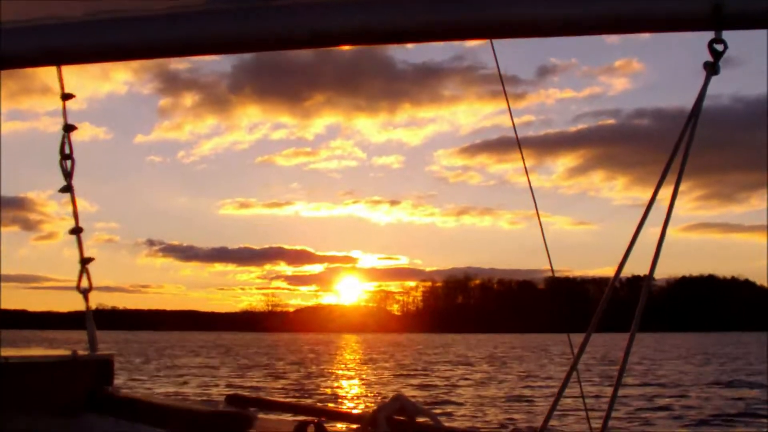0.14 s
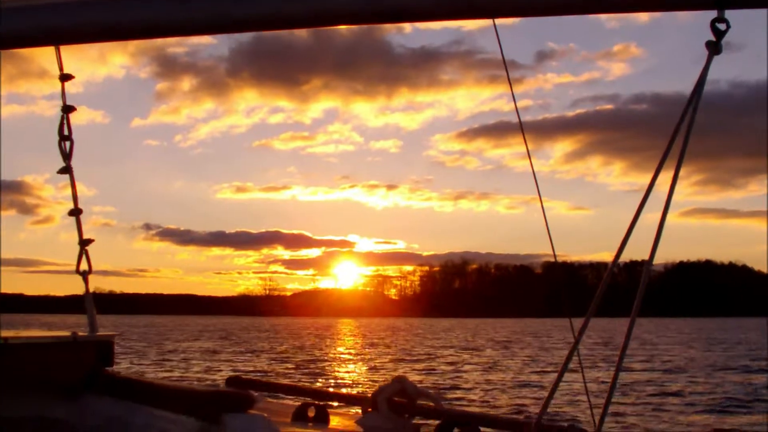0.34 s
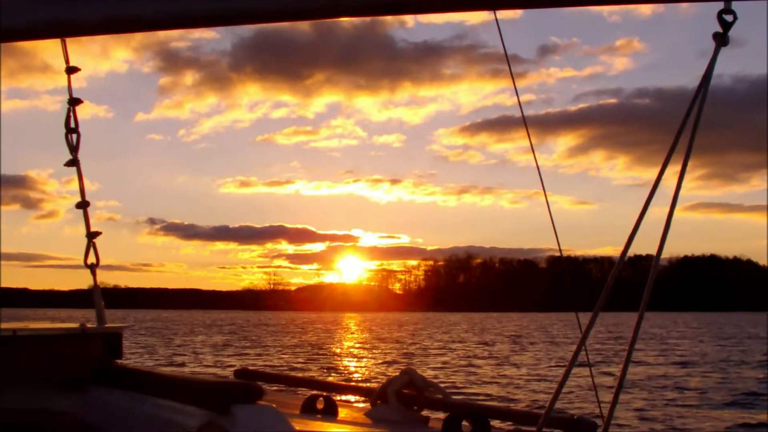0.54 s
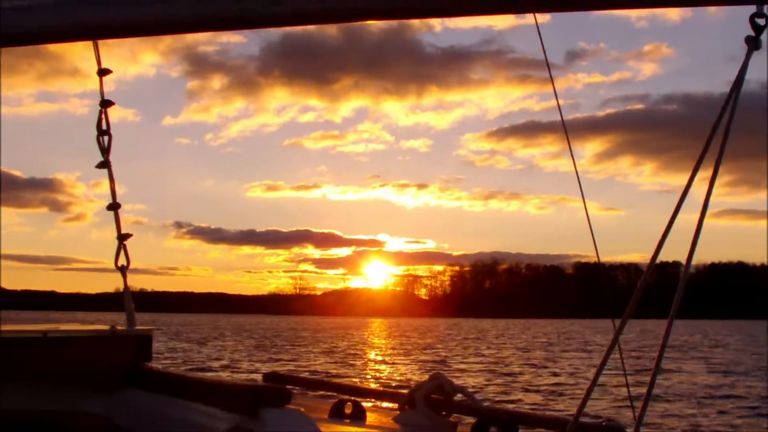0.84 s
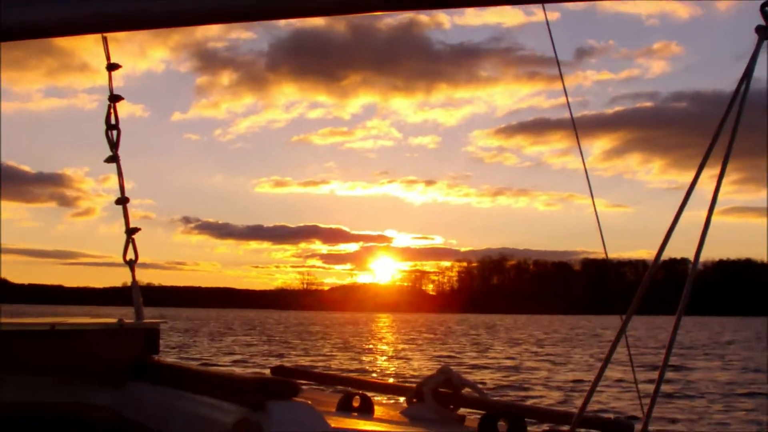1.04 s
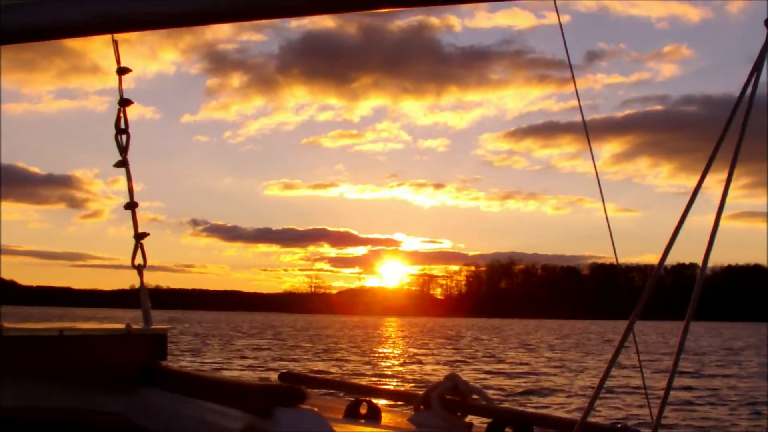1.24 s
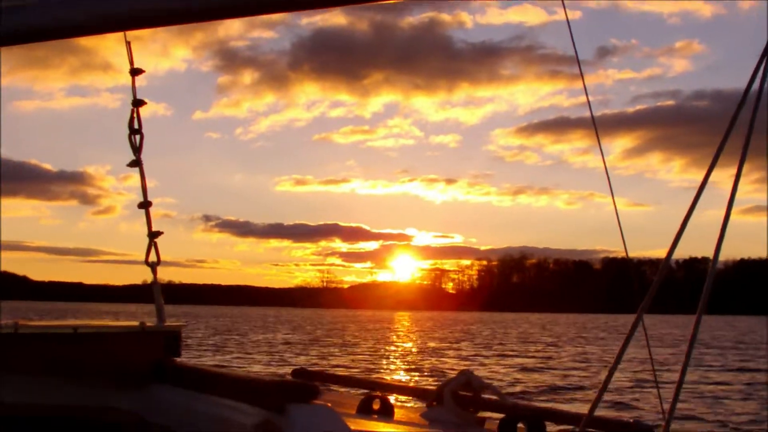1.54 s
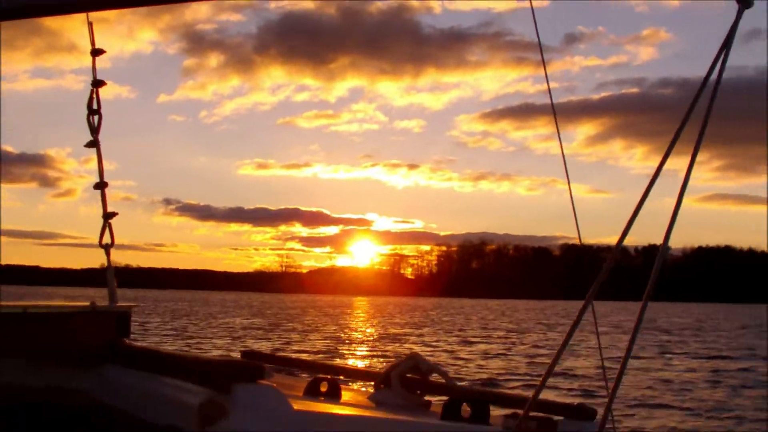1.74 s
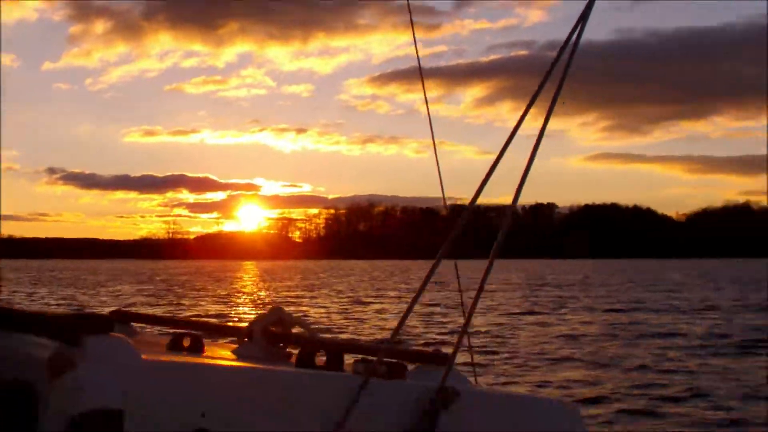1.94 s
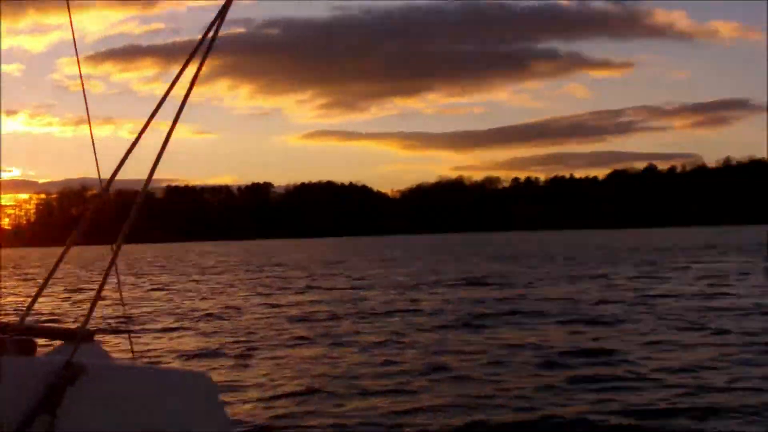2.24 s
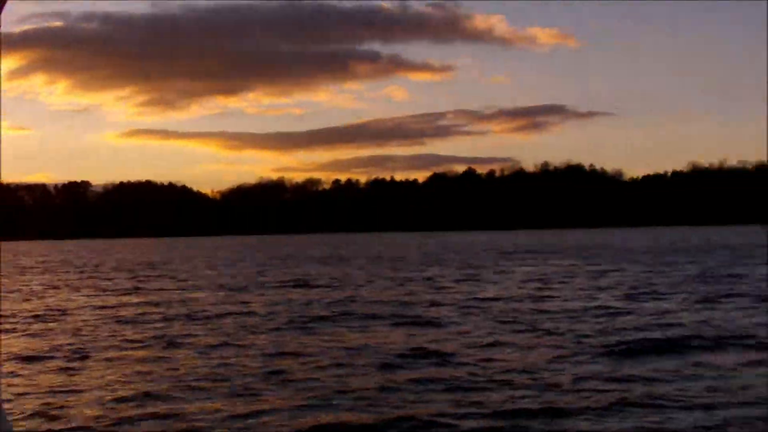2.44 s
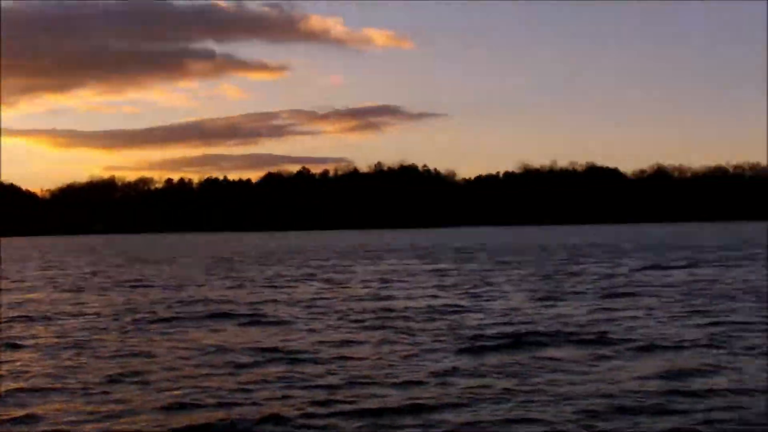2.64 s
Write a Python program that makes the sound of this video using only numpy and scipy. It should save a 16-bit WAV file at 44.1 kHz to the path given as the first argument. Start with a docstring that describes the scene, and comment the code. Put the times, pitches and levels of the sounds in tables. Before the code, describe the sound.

Water washes and trickles steadily along a small sailboat hull on an open lake; low wind thuds buffet the microphone early, then sharp gear ticks, a soft knock and a clack come as the water brightens.

```python
"""Sailboat hull under way on a lake

Filtered noise washes along the hull, with ringing bubbles for trickles and splashes; later it brightens.
Early on a gust buffets the microphone: low noise and short thuds. The hull knocks once, softly.
Gear ticks, scrapes and clacks in short sines and noise bursts. The sound is all but mono."""
import sys
import numpy as np
from scipy import signal
from scipy.fft import rfft, irfft
from scipy.io import wavfile

SR = 44100
rng = np.random.default_rng(int(sys.argv[2]) if len(sys.argv) > 2 else 0)


def dump(signal):
    """Clip the signal to [-1, 1] and save it as 16-bit WAV at the path in sys.argv[1]."""
    limited = np.clip(np.atleast_2d(signal).T, -1, 1)
    pcm = np.round(limited * 32767).astype(np.int16)
    wavfile.write(sys.argv[1], SR, pcm)


N = 123479

# level changes of the water: (time [s], body [dB], treble [dB])
FLOW = [(0, 1.5, 0.5), (.9, -0.5, 0), (1.2, 3.5, 0), (1.6, -1.5, -0.5), (2.0, 0.5, -0.5), (2.22, 2, 1.5),
        (2.45, 4, 3.5), (2.8, 0.5, 6)]
BUBBLE_CYCLES = 7.2  # decay of a water bubble
RASP_RATE_HZ = 940  # grain of scrapes and clack


def undb(db):
    """Decibels to gain."""
    return 10 ** (np.asarray(db) / 20)


def unit(x):
    """Scale to rms 1."""
    return x / np.sqrt(np.mean(x ** 2))


def since(start=0):
    """Seconds since a moment, for every sample."""
    return np.arange(N) / SR - start


def curve(rows, axis=1):
    """One column of a table, joined by straight lines in time."""
    rows = np.array(rows)
    return np.interp(since(), rows[:, 0], rows[:, axis])


def freqs():
    """Frequencies of the spectrum bins in Hz, at least 1."""
    return np.maximum(np.arange(N // 2 + 1) * SR / N, 1)


def colour(points):
    """Gain per bin from (Hz, dB) points, on a log frequency axis."""
    hz, db = np.array(points).T
    return undb(np.interp(np.log(freqs()), np.log(hz), db))


def resonance(hz, width_hz):
    """Gain per bin of a steep-sided resonance."""
    f = freqs()
    return 1 / (1 + ((f - hz * hz / f) / (1.67 * width_hz)) ** 2)


def noise(gain):
    """Noise of rms 1 with the given spectrum."""
    return unit(irfft(rfft(rng.standard_normal(N)) * gain, N))


def walk(rate_hz):
    """Smooth random wander of rms 1, its spectrum a Gaussian."""
    return noise(np.exp(-np.minimum(freqs() / rate_hz, 20) ** 2))


def burst(start, attack_s, decay_s):
    """Linear rise, exponential fall."""
    t = np.maximum(since(start), 0)
    fall = np.exp(-np.minimum(np.maximum(t - attack_s, 0) / decay_s, 20))
    return np.minimum(t / attack_s, 1) * fall


def hump(peak, half_s):
    """Gaussian swell around a moment."""
    return np.exp(-np.minimum((since(peak) / half_s) ** 2, 20))


def thud(start, hz, length_cycles):
    """One low swing at a random phase that swells and dies within a few cycles."""
    cycles = since(start) * hz
    envelope = 1 / np.cosh(np.clip(cycles / length_cycles, -20, 20))
    return envelope * np.cos(2 * np.pi * (cycles + rng.random()))


def bubble(hz, decay_cycles):
    """A bubble rings down over a few cycles, gliding up slightly."""
    t = np.arange(2048) / SR
    age = t * hz / decay_cycles
    glide = 1 + 0.01 * np.minimum(age, 10)
    attack = np.minimum(t * hz, 1)
    return np.exp(-age) * attack * np.sin(2 * np.pi * hz * t * glide)


def add(out, start, sound):
    """Mix a short sound in at a moment."""
    part = out[max(int(start * SR), 0):][:len(sound)]
    part += sound[:len(part)]


def side_hiss():
    """Very faint steady noise, opposite in left and right, practically inaudible."""
    # (frequency [Hz], density [dB per Hz])
    hiss_colour = [(40, 6), (200, 0), (1000, -14), (2500, -19), (7000, -11), (10000, -0.5), (13000, 11),
                   (15000, 4), (16000, -7)]
    return undb(-86.5) * noise(colour(hiss_colour))


def thump():
    """The hull gives one soft knock in a brief, deep rumble."""
    start, half_s = 2.2425, 0.0057
    # (frequency [Hz], density [dB per Hz])
    rumble_colour = [(25, -11), (70, 2.5), (150, -11), (270, 5), (400, -4), (700, -18), (2000, -48)]
    rumble = undb(-50) * hump(start, np.sqrt(2) * half_s) * noise(colour(rumble_colour))
    knock = undb(-41.5) * thud(start, hz=310, length_cycles=0.27)
    return rumble + knock


def ticks():
    """Hard little contacts crack around their pitch, ring for an instant and scatter off the deck."""
    crack_db, tail_db, tail_decay_s = -10, -33, 0.018
    # sharp ticks of gear: (time [s], pitch [Hz], level [dB], decay [s])
    contacts = [(.6365, 8640, -47, 0.0025), (.642, 8400, -43, 0.0014), (1.7865, 2920, -36.5, 0.0014),
                (2.1085, 9950, -27.5, 0.0005), (2.135, 9020, -18.5, 0.00018),
                (2.1943, 2970, -31.5, 0.00095), (2.2028, 8900, -29.5, 0.00064)]
    # reflections off the deck: (delay [s], level re tick [dB])
    reflections = [(.005, -17), (.008, -29)]
    out = 0
    for start, hz, db, decay_s in contacts:
        tone = np.sin(2 * np.pi * hz * since(start))
        crack = undb(crack_db) * noise(resonance(hz, 0.39 * hz))
        direct = (tone + crack) * burst(start, 0.000215, decay_s)
        scatter = undb(tail_db) * burst(start, 0.0044, tail_decay_s)
        for delay_s, echo_db in reflections:
            scatter = scatter + undb(echo_db) * burst(start + delay_s, 0.00037, 0.0013)
        out = out + undb(db) * (direct + scatter * noise(resonance(hz, 0.22 * hz)))
    return out


def scrapes():
    """Gear slips briefly: a bright, grainy rasp that swells and dies."""
    rasp_db, tail_db, tail_decay_s = 3.5, -16.5, 0.011
    # slips of gear: (peak time [s], level [dB], half length [s])
    slips = [(1.563, -46, 0.0031), (1.57, -58.5, 0.0063), (2.2026, -39, 0.0027), (2.409, -38, .003),
             (2.42, -50, 0.0042), (2.434, -44, 0.0021), (2.504, -39, 0.0032)]
    # (frequency [Hz], density [dB per Hz])
    rasp_colour = [(500, -25), (2000, -11), (4800, -3), (6050, 6.5), (6800, 0.5), (8500, -6), (9400, 0),
                   (11200, -1.5), (12300, -11), (13600, -1.5), (16000, -20)]
    envelope = 0
    for peak, db, half_s in slips:
        tail = undb(tail_db) * burst(peak, half_s, tail_decay_s)
        envelope = envelope + undb(db) * (hump(peak, half_s) + tail)
    grain = undb(rasp_db * walk(RASP_RATE_HZ))
    return envelope * unit(noise(colour(rasp_colour)) * grain)


def clack():
    """A fitting snaps over with a crackle, chatters, sounds its short modes and leaves a thin ring."""
    start, level_db, decay_s, mode_decay_s = 2.5115, -38.5, 0.012, 0.009
    grain_db, bounce_decay_s = 3.5, 0.0011
    ring_start, ring_hz, ring_width_hz, ring_db, ring_decay_s = 2.522, 10800, 400, -45.5, 0.009
    # crackle: (frequency [Hz], density [dB per Hz])
    crackle_colour = [(200, -29), (700, -16.5), (1400, -5.5), (1900, 4), (2400, -5), (3300, -11), (3950, 0),
                      (4700, 5), (5600, 0.5), (7000, -10), (9200, -6), (12000, -11), (16000, -32)]
    # modes of the fitting: (frequency [Hz], level re clack [dB])
    mode_table = [(1910, -5), (2705, -7), (3945, -3.5), (4710, -2), (5535, -5)]
    # chatter: (delay [s], level re clack [dB])
    bounce_table = [(.0026, 3), (.0055, -2), (.0088, 1)]

    modes = sum(undb(db) * np.sin(2 * np.pi * hz * since(start)) for hz, db in mode_table)
    crackle = unit(noise(colour(crackle_colour)) * undb(grain_db * walk(RASP_RATE_HZ)))
    strikes = burst(start, 0.0004, decay_s)
    for delay_s, db in bounce_table:
        strikes = strikes + undb(db) * burst(start + delay_s, 0.00024, bounce_decay_s)
    body = strikes * crackle + burst(start, 0.00036, mode_decay_s) * modes
    ring = burst(ring_start, 0.0005, ring_decay_s) * noise(resonance(ring_hz, ring_width_hz))
    return undb(level_db) * body + undb(ring_db) * ring


def gust():
    """Turbulence rumbles on the microphone; single eddies thud briefly, with an edge an octave up."""
    rough_db, rough_rate_hz, edge_db = 2.5, 113, -15
    bass_hz, bass_width_hz, bass_db = 85.6, 35, -62.5
    start, end, fade_s = 0.183, 0.97, 0.026
    # rumble: (frequency [Hz], density [dB per Hz])
    rumble_colour = [(20, -53), (45, -48), (70, -9), (140, -12), (200, -1), (250, 0.5), (400, -5),
                     (500, -8.5), (650, -17.5), (900, -20), (1400, -31), (3000, -43), (8000, -77)]
    # force of the gust: (time [s], level [dB])
    force = [(.19, -70), (.228, -57), (.275, -62), (.315, -45), (.36, -54.5), (.385, -53), (.432, -55),
             (.465, -44.5), (.545, -45), (.61, -44.5), (.68, -39), (.735, -48.5), (.82, -41), (.86, -49),
             (.915, -42), (.968, -49), (.995, -71)]
    # strongest buffets: (time [s], pitch [Hz], level [dB], length [cycles])
    buffets = [(.229, 243, -41.5, 0.26), (0.2467, 260, -30, 0.41), (0.2958, 367, -30.5, 0.24),
               (0.34, 313, -32, 0.44), (.376, 307, -42, 0.39), (.404, 334, -38.5, 0.32),
               (0.4491, 273, -32.5, 0.39), (0.4614, 429, -34, 0.49), (.4728, 340, -31.5, 0.34),
               (0.496, 344, -31, 0.25), (.5013, 255, -29.5, 0.47), (0.5199, 346, -33.5, 0.99),
               (.559, 347, -31.5, 0.37), (0.5646, 323, -27.5, 0.49), (.572, 355, -33, 0.36),
               (0.5969, 283, -29.5, 0.48), (0.6009, 325, -23.5, 0.455), (0.6388, 336, -28, .65),
               (.663, 414, -28, 0.35), (0.6705, 380, -20, 0.37), (0.681, 290, -24, 0.48),
               (0.6928, 333, -24.5, 0.47), (.727, 380, -31.5, 0.31), (0.7525, 237, -32, 0.75),
               (.7671, 454, -32, .4), (0.7876, 356, -29, 0.4), (0.8037, 417, -25.5, 0.64),
               (.814, 273, -27.5, .6), (0.828, 257, -35.5, 0.29), (0.8417, 300, -30, 0.47),
               (0.9008, 390, -30, 0.36), (.906, 210, -35, 0.53), (0.9165, 368, -31, .5),
               (.938, 194, -35.5, 0.68), (.953, 238, -40.5, 0.41), (.967, 247, -40.5, 0.47)]

    rough = undb(rough_db * walk(rough_rate_hz))
    out = unit(noise(colour(rumble_colour)) * rough) * undb(curve(force))
    blowing = np.clip(np.minimum(since(start), -since(end)) / fade_s, 0, 1)
    out = out + undb(bass_db) * blowing * noise(resonance(bass_hz, bass_width_hz))
    for moment, hz, db, cycles in buffets:
        edge = undb(edge_db) * thud(moment, 2 * hz, cycles)
        out = out + undb(db) * (thud(moment, hz, cycles) + edge)
    return out


def trickle():
    """Tiny bubbles burst at random, a few much louder than the rest."""
    rate_per_s, level_db, spread_db = 320, -64.5, 4.5
    low_hz, high_hz = 702.3, 7670
    out = np.zeros(N)
    for when, pitch, size, ring in rng.random((int(rate_per_s * N / SR), 4)):
        hz = low_hz * (high_hz / low_hz) ** pitch
        gain = undb(-spread_db * np.log(max(size, 0.03)))  # exponential spread in dB
        add(out, when * N / SR, gain * bubble(hz, BUBBLE_CYCLES * (0.5 + ring)))
    return unit(out) * undb(level_db + curve(FLOW, axis=2))


def splashes():
    """Wavelets break on the hull: bubbles around one pitch, in a spatter with more or less broad spray."""
    width_ratio, attack_s, pitch_spread = 0.18, 0.0017, 0.12
    bubble_db, fade_db = 0.5, 16
    # small splashes: (time [s], centre [Hz], level [dB], decay [s], spray re splash [dB])
    wavelets = [(.302, 4930, -52, 0.017, -16), (.399, 4630, -58, .022, -22), (.557, 2420, -51, .0074, -9),
                (.686, 6700, -55.5, .015, -18), (.733, 3800, -60, .007, -19),
                (.895, 3500, -58.5, .014, -14), (1.021, 5400, -54, .013, -12),
                (1.151, 4750, -53, 0.019, -14), (1.325, 5860, -57, .018, -2.5),
                (1.342, 1960, -53, .0093, -4.5), (1.437, 5600, -50.5, 0.0098, 0),
                (1.466, 5570, -54, .0063, -12), (1.517, 6060, -56.5, .005, -11),
                (1.606, 3760, -56.5, .017, -9), (1.61, 1750, -55, .012, -14), (1.685, 2920, -57, .012, -14),
                (1.716, 1920, -56, .011, -4.5), (1.861, 1510, -53, .006, -20),
                (1.938, 3380, -55, .0087, -2), (2.014, 6200, -58.5, .0054, 3.5),
                (2.065, 5400, -51, .014, -1), (2.089, 2040, -51.5, .0081, -6), (2.175, 5430, -52, .01, 2.5),
                (2.186, 1570, -54, .022, -12), (2.204, 3930, -50.5, 0.02, -5), (2.214, 1600, -52, .01, -22),
                (2.342, 5800, -53.5, .008, 1.5), (2.492, 2300, -51, .012, -3), (2.636, 3760, -58, .01, 4),
                (2.678, 4650, -54, .016, -3)]
    # broad spray: (frequency [Hz], density [dB per Hz])
    spray_colour = [(800, -23), (2800, 0), (6800, 2), (11000, -7.5), (16000, -19)]
    out, spray = np.zeros(N), noise(colour(spray_colour))
    for start, hz, db, decay_s, spray_db in wavelets:
        spatter = undb(-3) * noise(resonance(hz, width_ratio * hz)) + undb(spray_db) * spray
        out += undb(db) * burst(start, attack_s, decay_s) * spatter
        ages = np.linspace(0, 1, 8) ** 1.5  # bubbles crowd the start
        for age, detune in zip(ages, rng.standard_normal(8)):
            gain = undb(db + bubble_db - fade_db * age)
            pitch_hz = hz * np.exp(pitch_spread * detune)
            add(out, start + 2 * decay_s * age, gain * bubble(pitch_hz, BUBBLE_CYCLES))
    return out


def wash():
    """Water along the hull: bands swell together, flicker on their own and follow the flow; a faint hum."""
    level_db, swell_db, flicker_db, treble_hz = -57.5, 0.98, 2, 1760
    hum_hz, hum_width_hz, hum_db = 303.1, 7.4, -71  # hollow tone under the wash
    # steady wash: (frequency [Hz], density [dB per Hz])
    water_colour = [(25, -15), (50, -19.5), (75, -7), (110, -28), (165, -51), (240, -7.5), (300, -2),
                    (380, -1.5), (550, 1.5), (1000, -3), (1750, -5.5), (2450, -10), (3000, -11.5),
                    (4100, -14.5), (5400, -15), (6100, -17.5), (7000, -16.5), (10500, -17.5), (12500, -25),
                    (16000, -26)]
    centres_hz = np.geomspace(50, 16000, 16)
    spectrum = rfft(noise(colour(water_colour)))
    swell = swell_db * walk(10)
    body, treble = curve(FLOW, axis=1), curve(FLOW, axis=2)
    out = 0
    for centre_hz, pick in zip(centres_hz, np.eye(len(centres_hz))):
        overlap = np.interp(np.log(freqs()), np.log(centres_hz), pick)  # triangular band
        band = irfft(spectrum * overlap, N)
        high = 1 / (1 + (treble_hz / centre_hz) ** 2)  # share of the treble curve
        flow = (1 - high) * body + high * treble
        out = out + band * undb(swell + flicker_db * walk(35) + flow)
    return undb(level_db) * out + undb(hum_db) * noise(resonance(hum_hz, hum_width_hz))


def scene():
    """Everything in the middle; very faint noise and a delayed gear copy, opposite in left and right,
    widen it slightly."""
    gear = ticks() + scrapes() + clack()
    mid = gust() + thump() + gear + trickle() + splashes() + wash()
    side = side_hiss() + undb(-28.5) * np.roll(gear, int(SR / 1000))  # 1 ms late
    return np.array([mid + side, mid - side])


def record(dry):
    """The microphone sheds the deepest bass, has a narrow notch in the treble, and the top is cut."""
    notch_hz, notch_width_hz, notch_depth = 7796, 340, 0.79
    notch = 1 - notch_depth * np.exp(-((freqs() - notch_hz) / notch_width_hz) ** 2)
    low_cut = signal.butter(N=3, Wn=42, btype="high", fs=SR, output="sos")
    top_cut = signal.ellip(10, 0.2, 80, 16000, fs=SR, output="sos")
    notched = irfft(rfft(dry) * notch, N)
    return signal.sosfilt(top_cut, signal.sosfilt(low_cut, notched))


dry = scene()
out = record(dry)
dump(out)
```